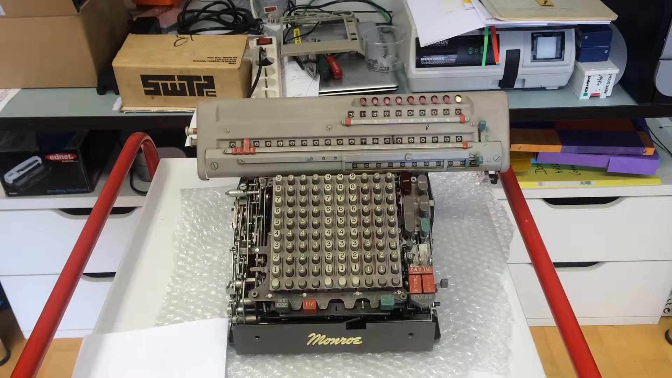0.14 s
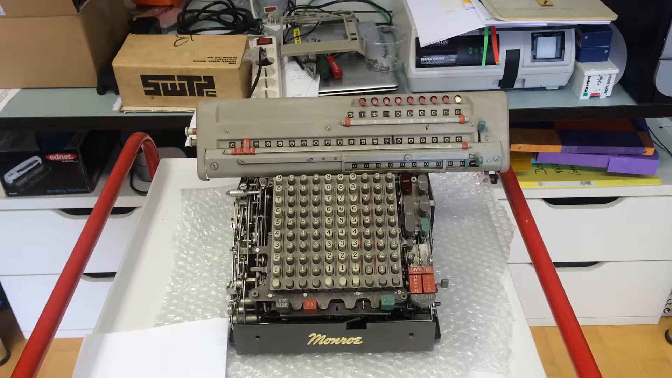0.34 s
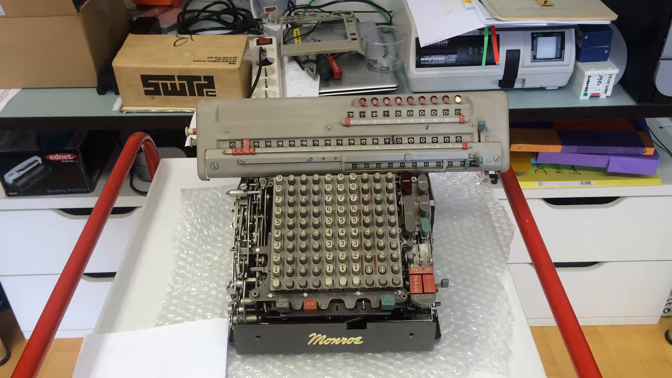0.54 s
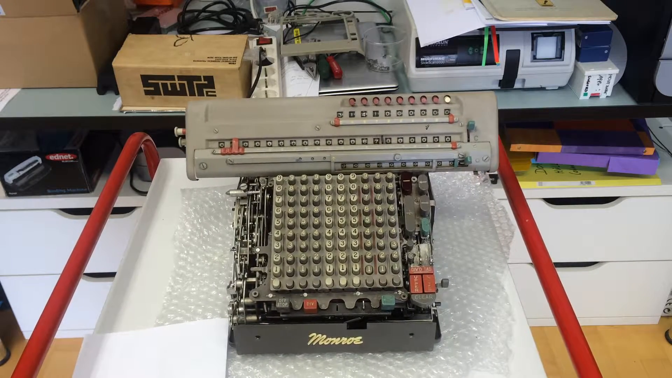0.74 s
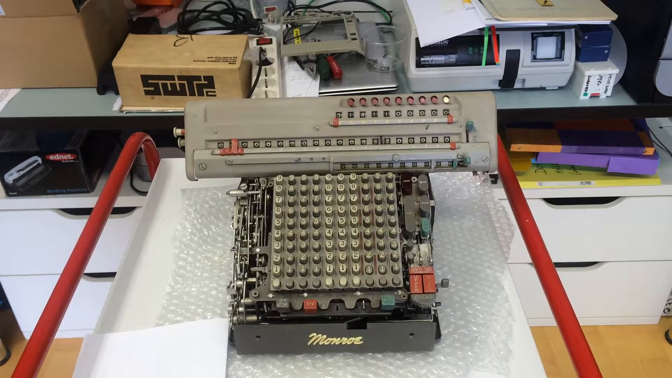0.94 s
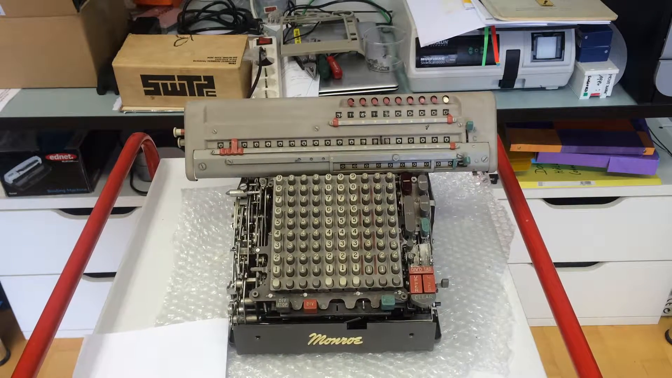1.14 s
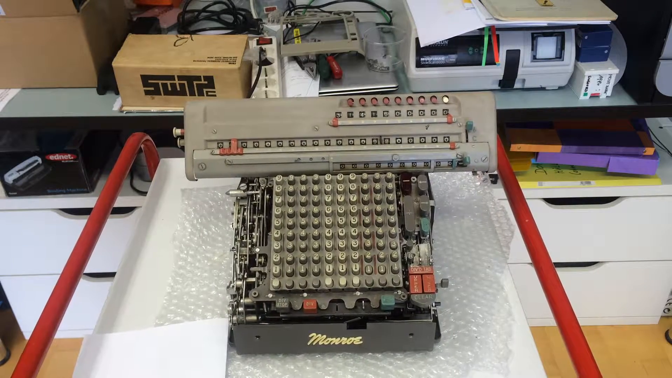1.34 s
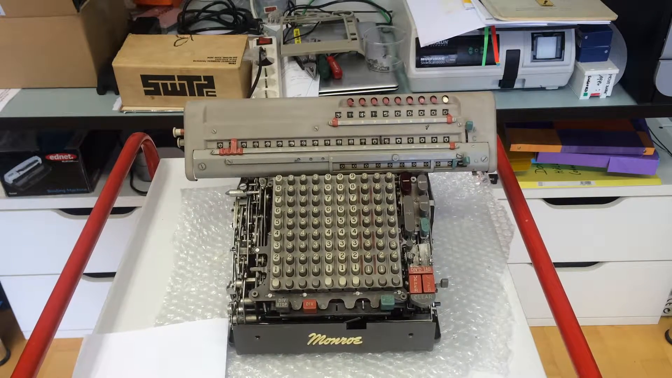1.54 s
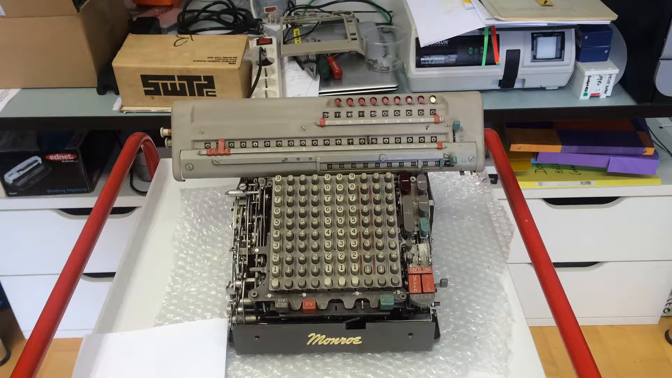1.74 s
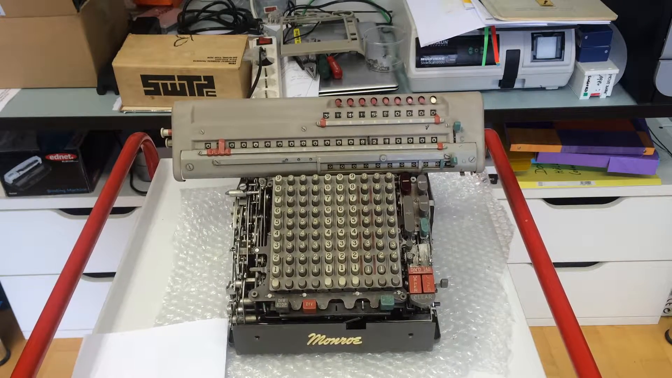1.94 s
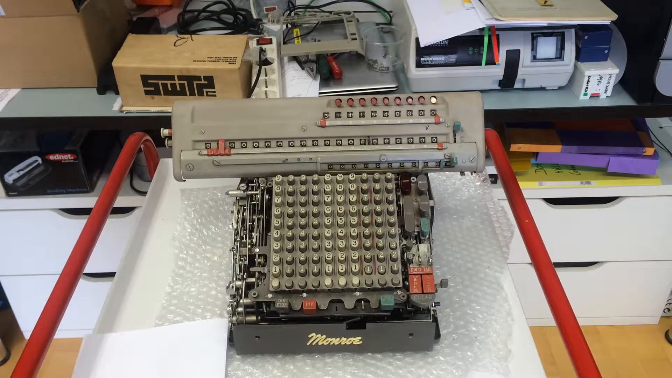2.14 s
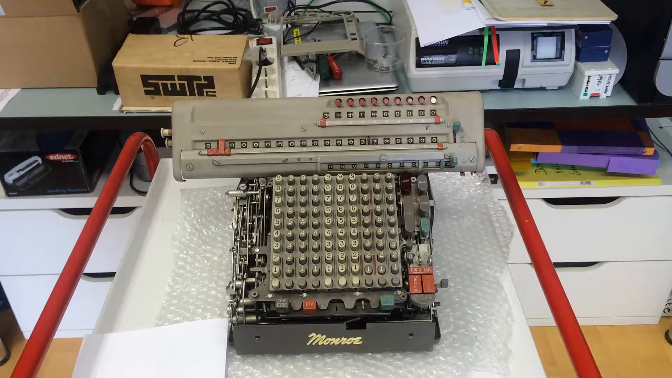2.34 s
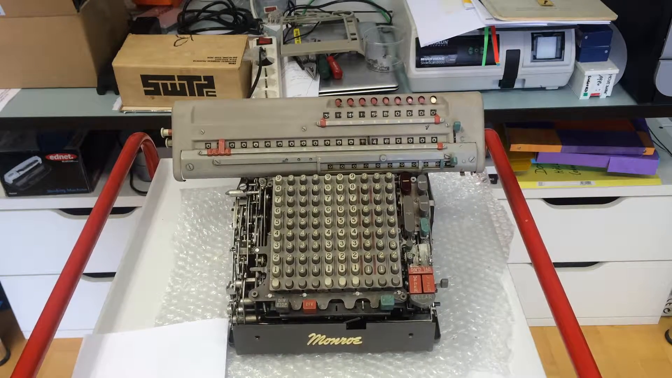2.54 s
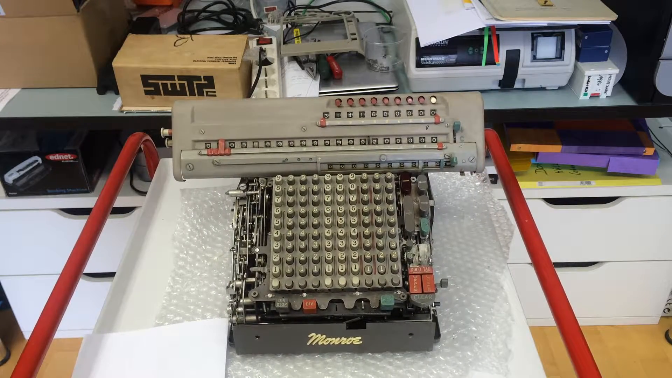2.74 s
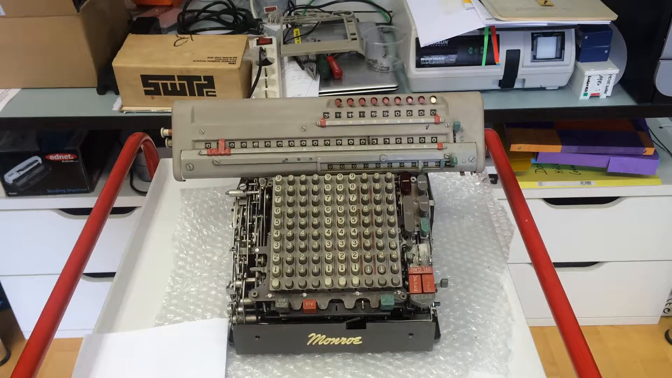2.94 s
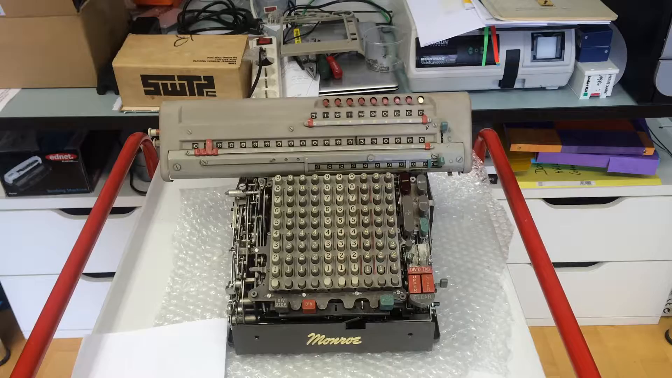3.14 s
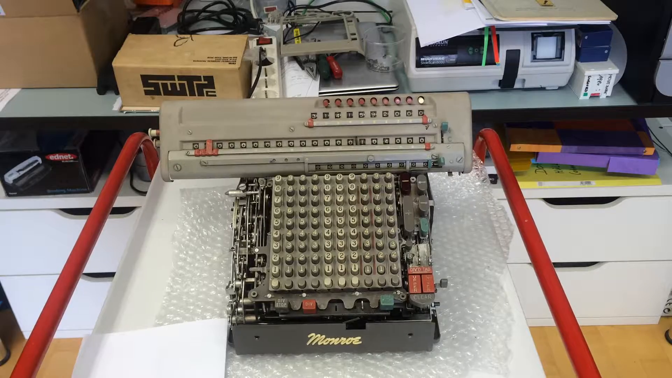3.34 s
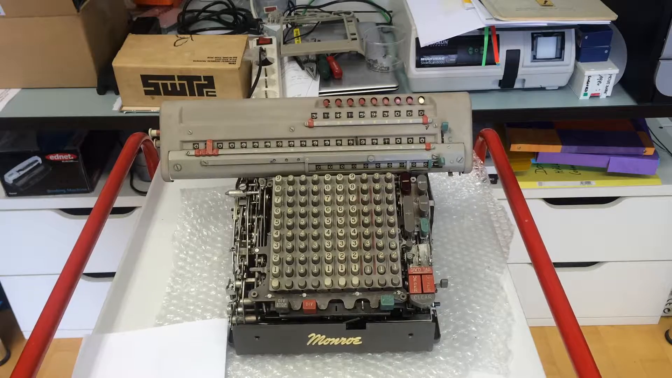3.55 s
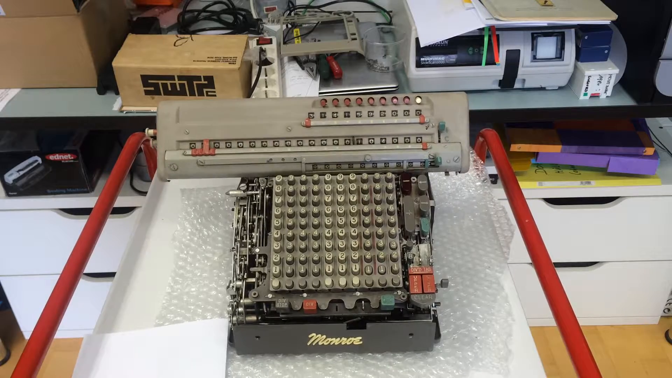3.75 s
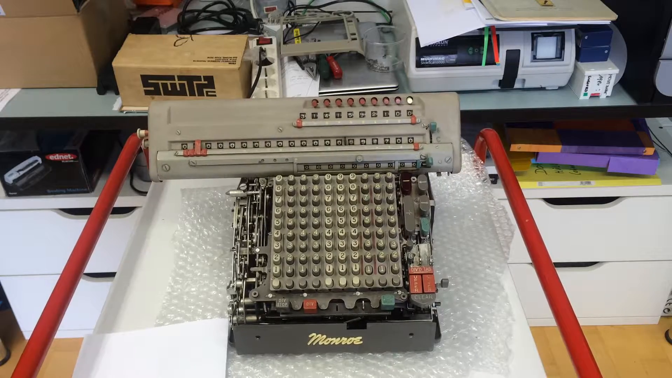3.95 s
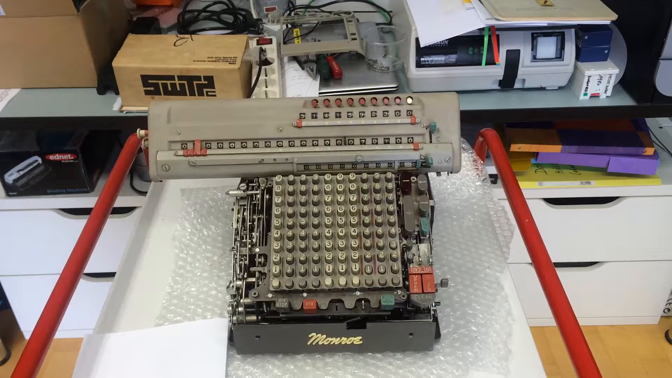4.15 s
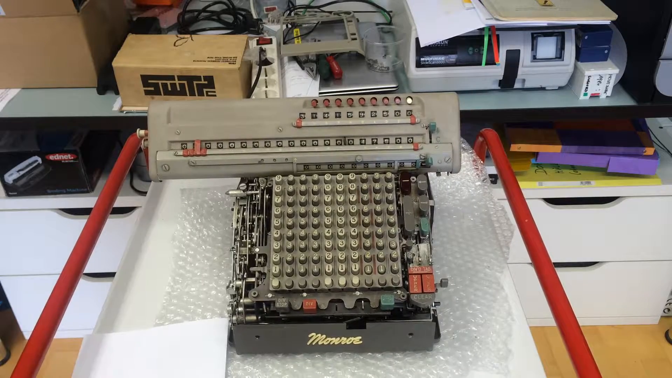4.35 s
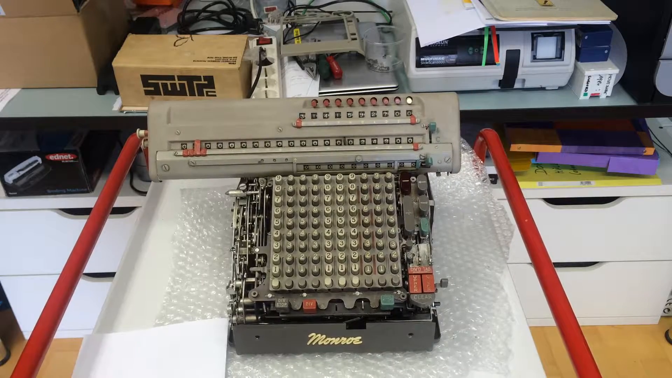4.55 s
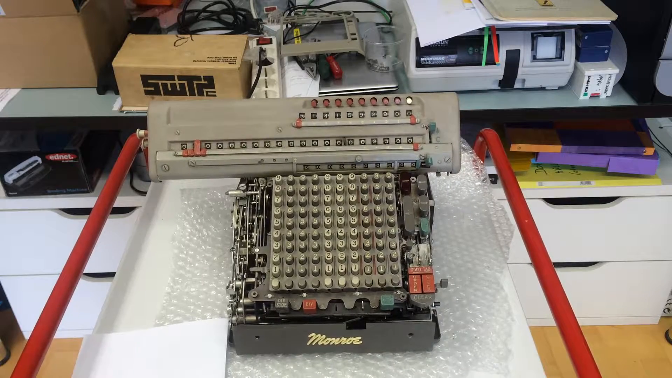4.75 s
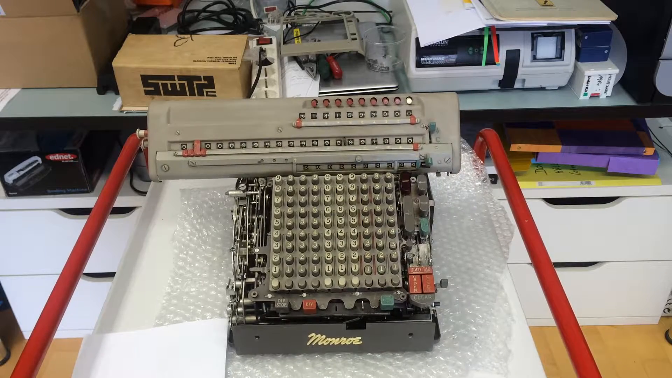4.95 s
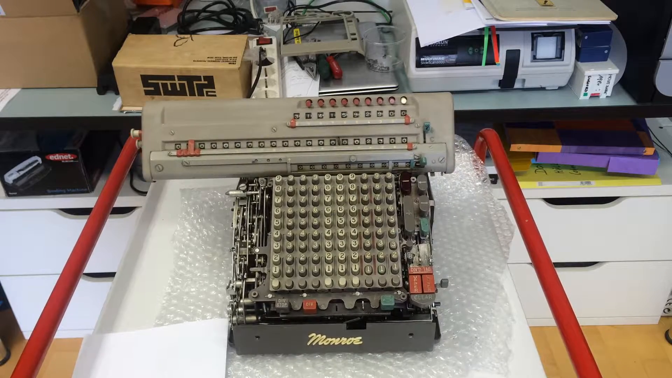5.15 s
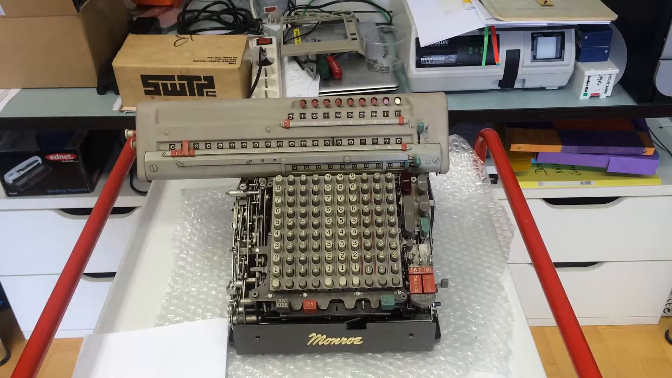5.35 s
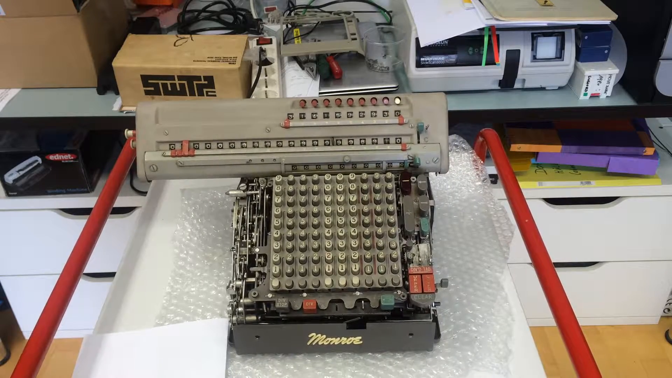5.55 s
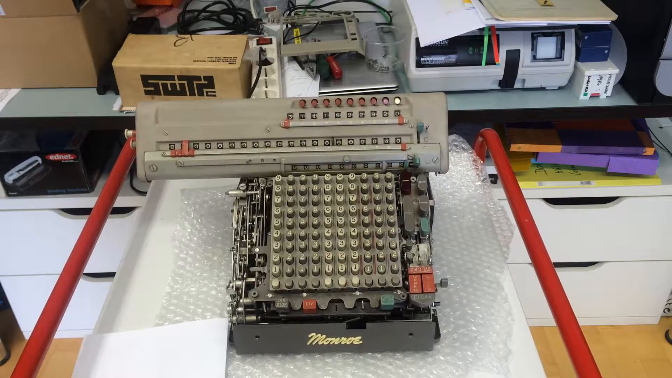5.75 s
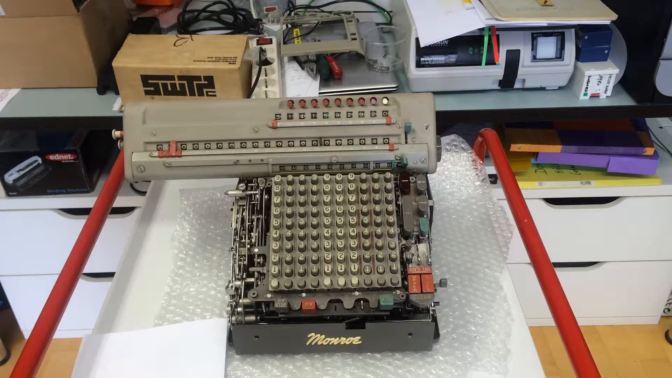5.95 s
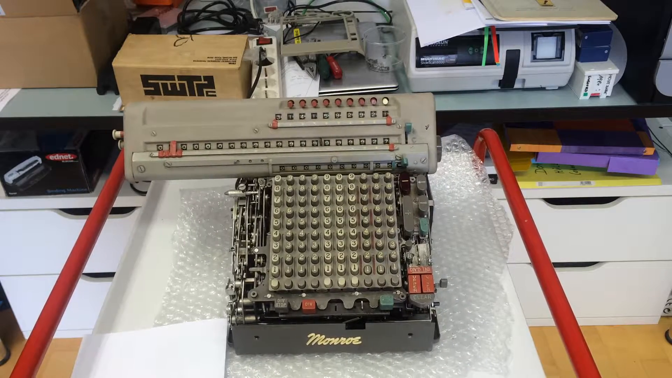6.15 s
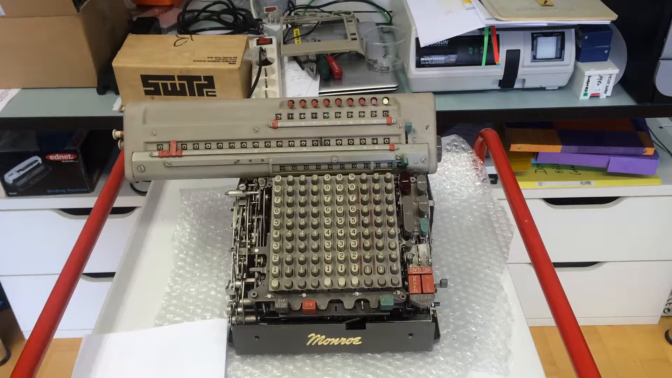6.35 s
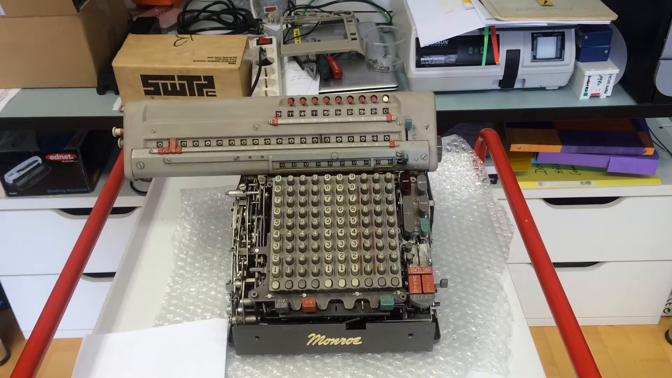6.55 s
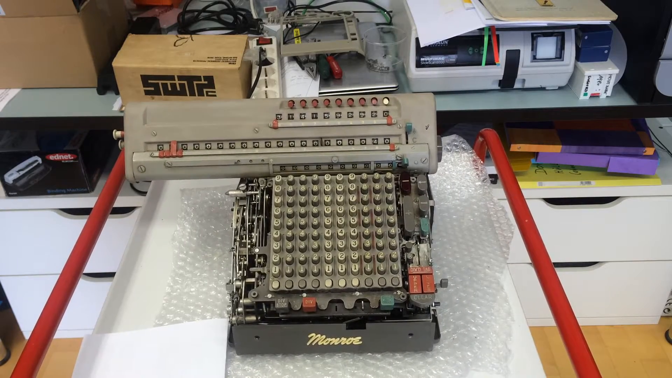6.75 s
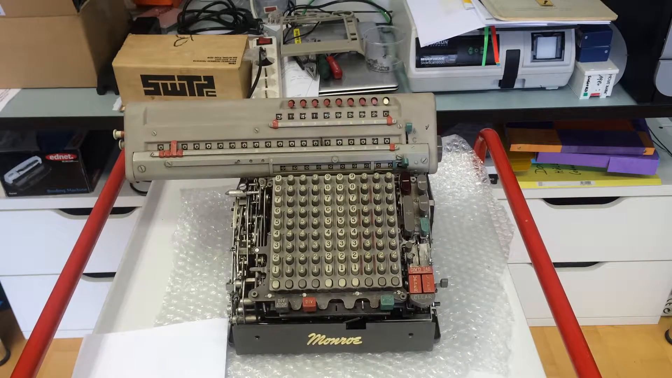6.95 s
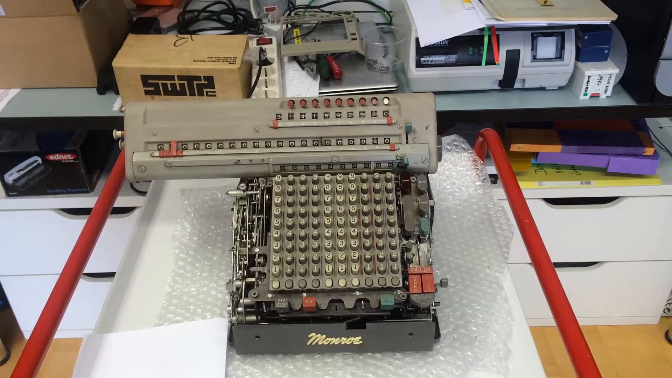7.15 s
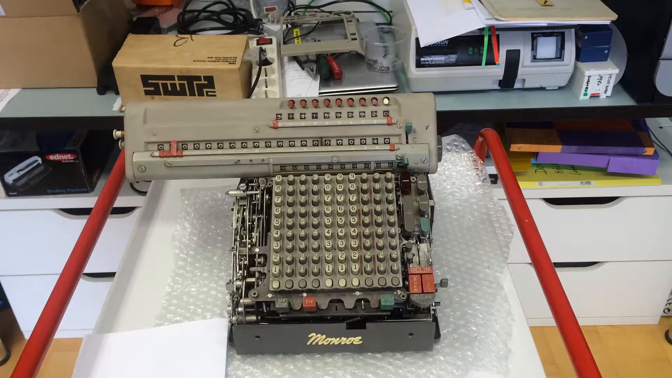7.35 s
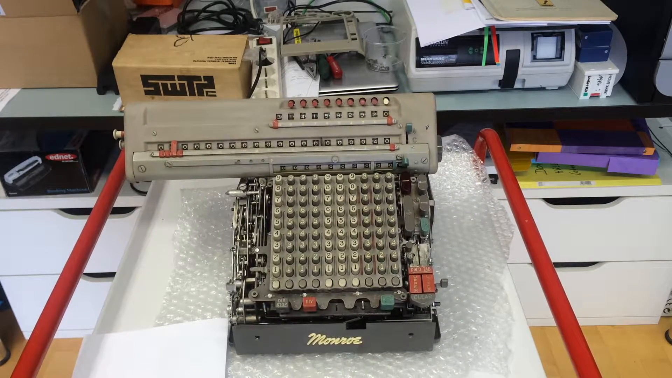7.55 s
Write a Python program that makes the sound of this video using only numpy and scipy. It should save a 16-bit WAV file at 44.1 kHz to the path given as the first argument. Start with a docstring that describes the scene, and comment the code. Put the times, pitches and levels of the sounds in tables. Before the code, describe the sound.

Rapid, rhythmic metal clatter comes from a nearby motor-driven calculating machine working through a division. Runs of even clicking alternate with clusters of sharp snaps and slams as its carriage steps along, with ticking gears and a hum underneath. The carriage finally lands with a hollow knock, the drive stops with a thud against the bench, and only the small room's faint rumble remains.

```python
"""An electro-mechanical calculator works through a division on a bench in a small, droning room.
Over motor hum and gear chatter, the main shaft turns ten times a second, snapping its pawls and
ringing the number wheels. After each digit, levers reverse the drive, a latch catches, the drive
slams home, the carriage locks one place along and subtraction resumes.
At the end the carriage lands with a hollow knock and a thud stops the machine."""
import sys
import numpy as np
from scipy import signal
from scipy.fft import rfft, irfft, next_fast_len
from scipy.io import wavfile
from scipy.ndimage import uniform_filter1d

SR = 44100
rng = np.random.default_rng(int(sys.argv[2]) if len(sys.argv) > 2 else 0)


def pcm_store(signal):
    """Save signal as 16-bit PCM."""
    levels = np.round(np.clip(np.atleast_2d(signal), -1, 1) * 32767)
    wavfile.write(sys.argv[1], SR, levels.astype(np.int16).T)


N = 335733
TIME = np.arange(N) / SR
LAND_S, STOP_S = 6.636, 6.778  # carriage lands, drive stops


def amp(db):
    """Decibels to gain."""
    return 10 ** (np.asarray(db) / 20)


def unit_rms(x):
    """Scales to rms 1."""
    return x / np.sqrt(np.mean(x ** 2) + 1e-20)


def unit_energy(x):
    """Scales to energy 1."""
    return x / np.sqrt(np.sum(x ** 2) + 1e-20)


def decay(t, t60_s):
    """Falls 60 dB in t60_s."""
    return np.exp(-np.log(1000) * t / t60_s)


def bell(hz, centre_hz, width_hz):
    """Resonance peak of height 1."""
    return 1 / (1 + (2 * (hz - centre_hz) / width_hz) ** 2)


def add(mix, start_s, sound):
    """Mixes a sound in, cropped at both ends."""
    start = round(start_s * SR)
    sound = sound[max(-start, 0):]
    part = mix[max(start, 0):][:len(sound)]
    part += sound[:len(part)]


def colour(x, curve, rings=(), size=8192):
    """Minimum-phase filter. Each row of rings: centre in Hz, width in Hz, lift in dB."""
    hz = abs(np.fft.fftfreq(size, 1 / SR))
    curve_hz, curve_db = np.transpose(curve)
    db = np.interp(np.log(hz + 1), np.log(curve_hz + 1), curve_db)
    db += sum(lift_db * bell(hz, centre_hz, width_hz) for centre_hz, width_hz, lift_db in rings)
    log_spectrum = np.conj(signal.hilbert(np.log(amp(db))))
    response = np.fft.ifft(np.exp(log_spectrum)).real
    return signal.oaconvolve(x, response[:size // 2])[:N]


def tones(rows):
    """Wavering tones: narrow resonances fed by noise."""
    hz = np.fft.rfftfreq(N, 1 / SR)
    noise = rfft(rng.standard_normal(N))
    spectrum = sum(amp(db) * unit_energy(noise * bell(hz, centre_hz, width_hz))
                   for centre_hz, db, width_hz in rows)
    return irfft(spectrum, N) * N / np.sqrt(2)


def ticks(length, per_s, spread_db):
    """Random small impacts of uneven size."""
    hit = rng.random(length) < per_s / SR
    size_db = spread_db * np.clip(rng.standard_normal(length), -2, 2)
    return hit * rng.choice([-1, 1], length) * amp(size_db)


def ring_parts(clicks, crack_t60_s, ring_t60_s, ring_db, count, build_s=0.0043):
    """Each impact hits one of count parts: a crack, a ring of crowded modes, that spot's room echoes."""
    # Early and late echoes. Each row: level in dB, t60 in seconds.
    room = [(-4.5, 0.25), (-16.5, 0.66)]
    t = np.arange(SR // 2) / SR
    crack, ring = unit_energy(decay(t, crack_t60_s)), unit_energy(decay(t, ring_t60_s))
    direct = unit_energy(crack + amp(ring_db) * ring)
    build = 1 - np.exp(-t / build_s)
    echo_power = sum((amp(db) * unit_energy(decay(t, t60_s) * build)) ** 2 for db, t60_s in room)
    envelope = np.sqrt(direct ** 2 + echo_power)
    part_hit = rng.integers(0, count, N)
    responses = [envelope * rng.choice([-1, 1], len(t)) for _ in range(count)]
    size = next_fast_len(N + len(t), True)
    spectrum = sum(rfft(clicks * (part_hit == k), size) * rfft(responses[k], size) for k in range(count))
    return irfft(spectrum, size)[:N]


def strikes(cues, strokes, rings, steel_db, frame_db, contact_s, swell_s, fade_s,
            per_s, spread_db, ring_db, count=6):
    """Strokes grind home and rattle loose parts: a steel clink plus the frame's duller clack.
    Each row of strokes: cue, delay in seconds, relative level, clack and rattle weights, all in dB."""
    # Spectra of the small steel parts and the frame. Each row: frequency in Hz, gain in dB.
    steel_curve = [(300, -38), (1200, -7.5), (2400, -3), (4200, -3.5), (6500, -4), (10000, -3), (14000, -4),
                   (15500, -4.5)]
    frame_curve = [(150, -26.5), (370, -16), (500, -1), (800, -1), (1100, 1), (1400, 1.5), (2000, 2.5),
                   (2800, -20), (6000, -28.5)]
    t = np.arange(SR // 8) / SR
    steel, frame = np.zeros(N), np.zeros(N)
    for cue, delay_s, db, clack_db, rattle_db in strokes:
        for cue_s, force_db in cues[cue]:
            contact = rng.standard_normal(len(t)) * np.sqrt(t) * np.exp(-t / contact_s)
            rattle = ticks(len(t), per_s, spread_db) * (1 - np.exp(-t / swell_s)) * np.exp(-t / fade_s)
            force = amp(db + force_db) * (unit_energy(contact) + amp(rattle_db) * unit_energy(rattle))
            add(steel, cue_s + delay_s, force)
            add(frame, cue_s + delay_s, amp(clack_db) * force)
    clink = ring_parts(steel, crack_t60_s=0.0016, ring_t60_s=0.08, ring_db=ring_db, count=count)
    clack = ring_parts(frame, crack_t60_s=0.031, ring_t60_s=0.028, ring_db=-6.5, count=count // 2)
    return (amp(steel_db) * colour(clink, steel_curve, rings)
            + amp(frame_db) * colour(clack, frame_curve, rings))


def background():
    """Low rumble and drone of the room."""
    # Each row: frequency in Hz, relative level in dB.
    rumble_curve = [(20, -29), (45, -13.5), (65, -4.5), (110, -2), (160, 3), (215, -6.5), (300, -22.5),
                    (600, -31.5), (1500, -33.5), (4000, -39), (15000, -47.5)]
    # Each row: frequency in Hz, level in dB, width in Hz.
    drone = [(81, -75.5, 6.7), (170.8, -77.5, 12)]
    return amp(-56.5) * unit_rms(colour(rng.standard_normal(N), rumble_curve)) + tones(drone)


def motor(clatter, run_down_s=0.05):
    """Hums louder as the linkage loads it; dies away when its switch opens."""
    # Each row: frequency in Hz, level at rms load in dB, width in Hz.
    hum = [(170.8, -77.5, 14), (294, -70, 38), (452.5, -79, 41), (638, -75, 22)]
    clatter_power = abs(uniform_filter1d(clatter ** 2, size=SR // 6))
    load = unit_rms(np.sqrt(clatter_power))
    run_down = np.exp(-np.maximum(TIME - STOP_S, 0) / run_down_s)
    return tones(hum) * (load + 1e-6) ** 0.55 * run_down


def thud():
    """The stopping drive jolts the machine against the bench."""
    # Each row: frequency in Hz, level in dB, t60 in seconds.
    bench_modes = [(100, -45, .14), (145, -39, .13), (290, -46, .2), (375, -49, .12), (455, -43, .13)]
    t = np.maximum(TIME - STOP_S, 0)
    return sum(amp(db) * decay(t, t60_s) * np.sin(2 * np.pi * hz * t) for hz, db, t60_s in bench_modes)


def wheels(cues, swell_s=0.009, detune=0.012):
    """Shaft turns and jolts ring the number wheels, never quite at the same pitch."""
    # Each row: cue, delay in seconds, force in dB.
    jolts = [("turn", 0, 0), ("resume", 0.012, 2), ("reverse", 0, 4), ("lock", -0.038, 2)]
    # Each row: frequency in Hz, relative level in dB, t60 in seconds.
    modes = [(1345, -42.5, .09), (1425, -42, .09), (1798, -33, 0.075), (1910, -38.5, .07)]
    t, out = np.arange(SR // 6) / SR, np.zeros(N)
    swell = 1 - np.exp(-t / swell_s)
    for cue, delay_s, force_db in jolts:
        for cue_s, _ in cues[cue]:
            for hz, db, t60_s in modes:
                cycles = hz * (1 + detune * rng.standard_normal()) * t + rng.random()
                envelope = amp(db + force_db) * swell * decay(t, t60_s)
                add(out, cue_s + delay_s, envelope * np.sin(2 * np.pi * cycles))
    return out


def gears(cues, coast_db=-12, unclutch_s=0.05):
    """Teeth tick densely, harder under load; the load drops just before the carriage lands."""
    # Adding back, then regaining speed. Each row: cue, delay and half-length in seconds, lift in dB.
    loads = [("slam", 0.04, 0.12, 7.2), ("resume", 0.085, 0.11, 4.5)]
    # Each row: frequency in Hz, gain in dB.
    curve = [(150, -18.5), (380, -11.5), (600, -8.5), (900, -4), (1400, -2.5), (2600, -2.5), (4000, -2),
             (6800, 1), (10500, -2), (15000, -2.5)]
    # Each row: centre in Hz, width in Hz, lift in dB.
    rings = [(650, 40, 2), (1116, 40, 2), (1345, 45, 2), (1425, 45, 2), (1792, 60, 2), (2336, 50, 2),
             (13520, 170, 3)]
    load_db = sum(lift_db * np.maximum(1 - abs(TIME - cue_s - delay_s) / half_s, 0)
                  for cue, delay_s, half_s, lift_db in loads for cue_s, _ in cues[cue])
    coasting = np.clip((TIME - LAND_S) / unclutch_s + 1, 0, 1)
    running = np.clip((STOP_S - TIME) / 0.025, 0, 1)
    effort = amp(load_db + coast_db * coasting) * running
    teeth = unit_rms(ticks(N, per_s=1100, spread_db=4.5))
    chatter = ring_parts(teeth * effort, crack_t60_s=0.0044, ring_t60_s=0.049, ring_db=1, count=8)
    return amp(-38.6) * colour(chatter, curve, rings)


def carriage(cues):
    """The carriage lands with a hollow knock and bounces."""
    # Rows as in strikes() and colour().
    strokes = [("land", 0, -12.5, -1, -8), ("land", 0.0146, -20, -5, -6)]
    rings = [(500, 350, -7), (900, 200, 4), (1120, 130, 5), (1430, 90, 5), (1610, 160, 8), (2230, 200, 9),
             (11000, 3000, 4)]
    return strikes(cues, strokes, rings, steel_db=14.5, frame_db=20.5, contact_s=0.0014,
                   swell_s=0.003, fade_s=0.008, per_s=1200, spread_db=6.5, ring_db=-3.5, count=4)


def slams(cues):
    """The drive slams against its stop."""
    # Rows as in strikes() and colour().
    strokes = [("slam", 0, -11, -14, -3), ("stop", 0.001, -14, -9, -15.5)]
    rings = [(460, 60, 4), (770, 140, 4), (1150, 300, 2), (1950, 200, 2), (3030, 300, 4.5), (3900, 500, 2),
             (12000, 3000, 3)]
    return strikes(cues, strokes, rings, steel_db=19, frame_db=24.5, contact_s=0.0021,
                   swell_s=0.0037, fade_s=0.009, per_s=980, spread_db=3, ring_db=-3)


def latches(cues):
    """Latches catch with a bright snap."""
    # Rows as in strikes() and colour().
    strokes = [("catch", 0, -10.7, -19, -4), ("slam", 0.049, -20, -18, -3.5), ("lock", 0, -8.7, -16.5, -2),
               ("land", -0.088, -10.5, -12, -4.5), ("land", 0.0538, -17, -28.5, -6.5),
               ("land", 0.0944, -24.5, -25, -4.5)]
    rings = [(660, 50, 2), (930, 220, 4), (4950, 300, 2), (5400, 700, 3.5), (6100, 400, 1.5),
             (13520, 170, 3)]
    return strikes(cues, strokes, rings, steel_db=16.5, frame_db=19.5, contact_s=0.0023,
                   swell_s=0.003, fade_s=0.011, per_s=800, spread_db=2, ring_db=1.5)


def levers(cues):
    """Levers throw the drive over and lift the carriage."""
    # Rows as in strikes() and colour().
    strokes = [("reverse", -0.002, -12.3, -9.5, 4), ("reverse", 0.037, -14, -13.5, -1.5),
               ("lock", -0.04, -13, -13, 4), ("lock", -0.021, -18, -15, -1),
               ("lock", 0.031, -11.2, -14.5, 0.8), ("lock", 0.051, -16, -18, -1),
               ("resume", 0.017, -18.5, -9, -4), ("resume", 0.052, -19, -10.5, 3),
               ("resume", 0.103, -21, -13, -2), ("land", -0.0653, -14, -9.5, -0.5),
               ("land", -0.0466, -15.5, -17, 1.5), ("land", 0.001, -13, -5.5, -5.5),
               ("stop", -0.011, -16, -12, -2.5)]
    rings = [(544, 35, 3), (660, 46, 3.6), (1116, 36, 4), (1340, 45, 3.8), (1425, 50, 3), (1536, 79, 3),
             (1775, 63, 3.3), (1920, 57, 2.5), (2270, 70, 1.1), (13520, 170, 4.3)]
    return strikes(cues, strokes, rings, steel_db=16.5, frame_db=20, contact_s=0.004,
                   swell_s=0.0098, fade_s=0.015, per_s=700, spread_db=3, ring_db=0)


def pawls(cues):
    """Pawls snap at each shaft turn, more sharply when one snags and lets go."""
    # Rows as in strikes() and colour().
    strokes = [("turn", 0, -16.7, -15, 0), ("turn", -0.02, -22.5, -13, -7), ("snag", 0.001, -13.5, -17, -9),
               ("resume", -0.013, -22, -18, -6), ("resume", 0, -14.5, -13, -1)]
    rings = [(645, 50, 0.5), (1390, 50, 5.5), (1430, 50, 2.5), (1776, 76, 5.5), (1850, 58, 6.5),
             (2100, 59, 2.5), (6050, 1400, 3.5), (13520, 170, 9)]
    return strikes(cues, strokes, rings, steel_db=14.5, frame_db=18.5, contact_s=0.0011,
                   swell_s=0.019, fade_s=0.02, per_s=600, spread_db=2, ring_db=6)


def division(turn_s=0.0963, trip_delay_s=0.031, turn_spread_db=0.8):
    """Cues as lists of (time in s, force in dB). One turn is one subtraction; an overdraw reverses."""
    # Each row, one per digit: reverse, catch, slam, lock and resume times in seconds, slam force in dB.
    digits = [(-0.135, -0.06, -0.015, 0.1, 0.2458, 1), (0.4782, 0.5474, 0.5696, 0.6872, 0.8497, -1),
              (1.4564, 1.533, 1.5605, 1.6818, 1.8297, -1), (2.827, 2.8966, 2.9402, 3.0633, 3.2054, -0.5),
              (3.5301, 3.6067, 3.6455, 3.7715, 3.909, 0.5), (4.9162, 4.9892, 5.03, 5.1531, 5.295, 2.5),
              (5.6247, 5.695, 5.7355, 5.864, 6.0012, 0), (6.1354, 6.212, 6.2445, 6.3656, 6.5003, 0.5)]
    # Times at which a pawl snags.
    snags_s = [0.2458, 1.2385, 2.2215, 4.3054]
    reverse_s, catch_s, slam_s, lock_s, resume_s, slam_db = np.transpose(digits)
    # Turns are counted back from the one that trips the next reversal.
    turns_s = np.concatenate([np.arange(trip_s - trip_delay_s, start_s + turn_s / 2, -turn_s)
                              for start_s, trip_s in zip(resume_s, reverse_s[1:])])
    even_force = {"reverse": reverse_s, "catch": catch_s, "lock": lock_s, "resume": resume_s,
                  "snag": snags_s, "land": [LAND_S], "stop": [STOP_S]}
    cues = {name: [(cue_s, 0) for cue_s in times_s] for name, times_s in even_force.items()}
    cues["slam"] = list(zip(slam_s, slam_db))
    cues["turn"] = list(zip(turns_s, turn_spread_db * rng.standard_normal(len(turns_s))))
    return cues


def scene():
    """The machine on its bench over the room's background, mono."""
    cues = division()
    linkage = pawls(cues) + levers(cues) + latches(cues) + slams(cues) + carriage(cues)
    clatter = linkage + gears(cues) + wheels(cues)
    return (clatter + thud() + motor(clatter) + background())[None]


def record(dry):
    """Steep low-pass on the top treble."""
    cutoff_hz = 15330
    lowpass = signal.firwin(801, cutoff_hz, window=("kaiser", 8), fs=SR)
    return signal.oaconvolve(dry, lowpass[None], "same")


dry = scene()
out = record(dry)
pcm_store(out)
```